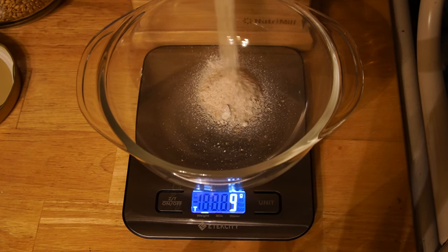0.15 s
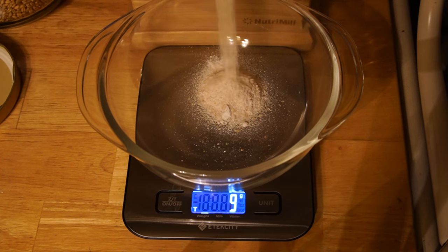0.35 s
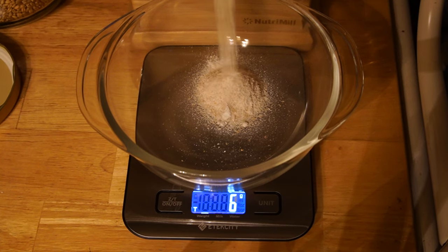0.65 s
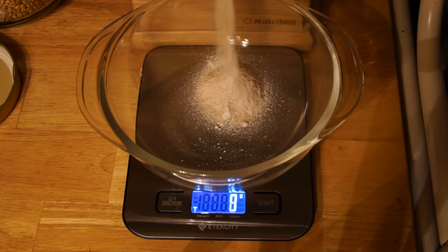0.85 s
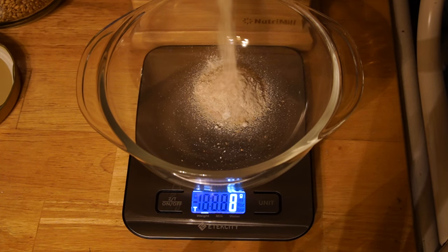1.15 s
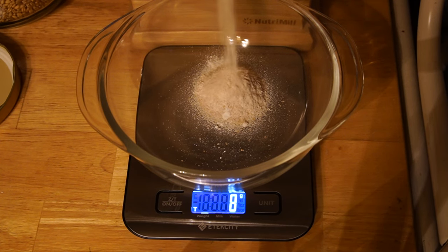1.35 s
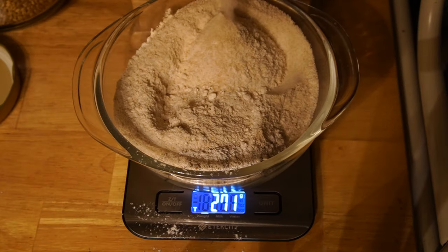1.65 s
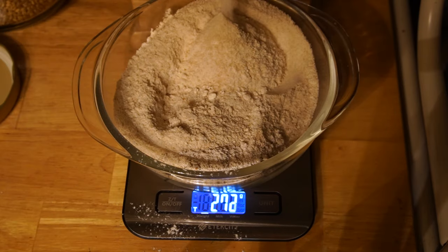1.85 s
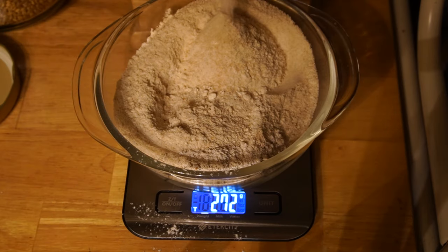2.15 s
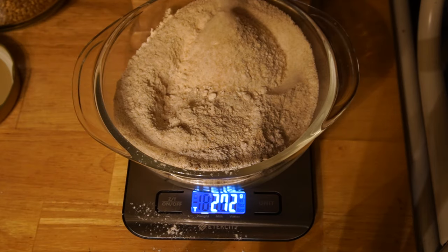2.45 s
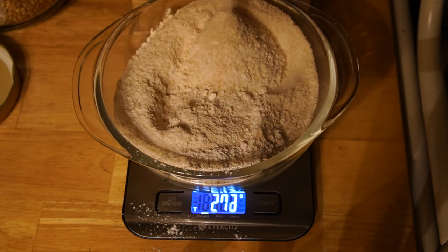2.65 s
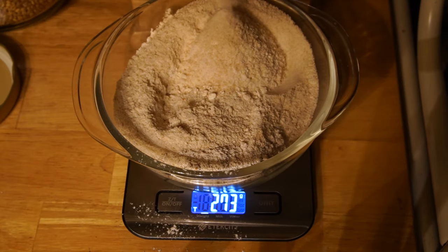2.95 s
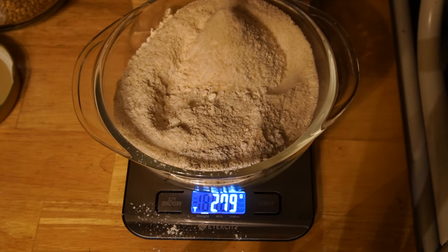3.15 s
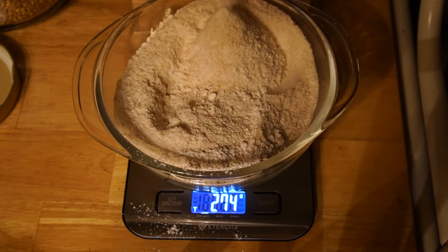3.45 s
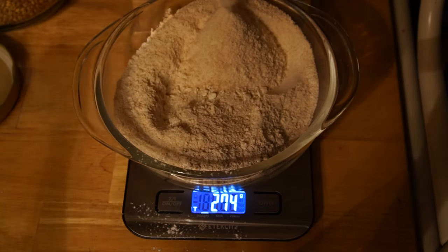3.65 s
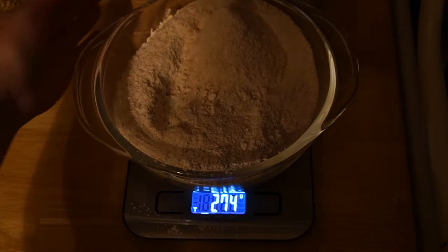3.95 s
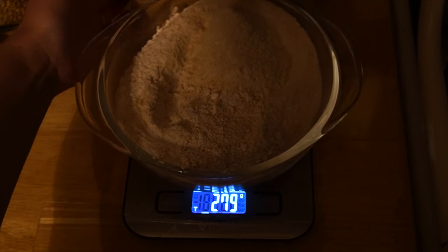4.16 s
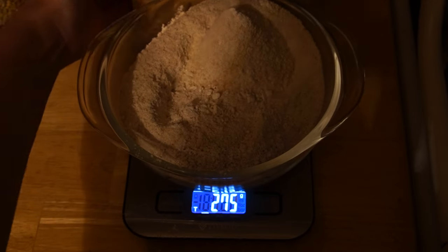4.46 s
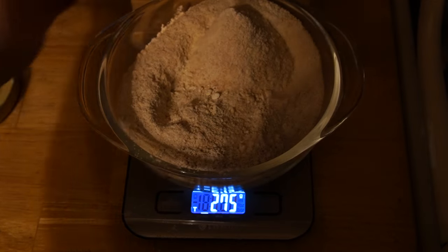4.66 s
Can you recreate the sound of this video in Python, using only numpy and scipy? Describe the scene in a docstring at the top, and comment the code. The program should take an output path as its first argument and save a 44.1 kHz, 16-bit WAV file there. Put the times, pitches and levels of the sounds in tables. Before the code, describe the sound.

A mill crushes grain in thick, uneven bursts, cracking sharply and spitting chips against its spout over a rush of flour. Suddenly the load is nearly gone: thin scraping, a held high whistle with a lower one beneath, and small ticks continue. Late on everything sinks, a rattly patch passes, and the stones halt. Close microphone, small dry kitchen, very faint reflections.

```python
"""On a kitchen counter, an electric grain mill runs at full feed; then the scene changes to the mill running
nearly empty. Kernels crushed between the stones knock the housing and splinter; chips rattle in the spout.
Flour hisses out as filtered noise, and the rubbing stones whistle in two narrow resonances. Late on, scrape,
rattle, hiss and whistles sink in level; the sine hum of the motor is switched off, and soon all grinding dies
away into a faint wash of reflections and the quiet room."""
import sys
import numpy as np
from scipy import signal
from scipy.fft import rfft, irfft
from scipy.io import wavfile
from scipy.ndimage import uniform_filter1d

SR = 44100
rng = np.random.default_rng(int(sys.argv[2]) if len(sys.argv) > 2 else 0)


def transcribe(u):
    """Save the signal u as a 16-bit wav file named by the first command-line argument.

    u: samples, shape (n,) or (channels, n), limited to [-1, 1]; the rate is SR.
    q: integer samples, one column per channel.
    """
    v = np.clip(np.atleast_2d(u).T, -1, 1)
    q = np.round(v * 32767).astype(np.int16)
    wavfile.write(sys.argv[1], SR, q)


def gain_from_decibels(decibels):
    """Convert decibel values to linear amplitude factors."""
    exponent = np.asarray(decibels, float) / 20
    return 10 ** exponent


N = 211724  # length in samples
T = np.arange(N) / SR  # time in s

CUT_S = 1.492  # full feed before, nearly empty after
SINK_S = 3.84  # scrape, rattle, hiss and whistles begin to sink, before the motor is switched off
OFF_S = 4.36  # the motor is switched off
FALL_S, FALL_DB_PER_S = 4.5, 113  # hiss, rattle and, half as fast, the upper whistle fall away
STOP_S, STOP_LOW_T60_S, STOP_HIGH_T60_S = 4.628, 0.09, 0.085  # the stones halt
CLUMP_ATTACK_S, CLUMP_FADE_DB_PER_S = 0.0086, 136.5
HUM_HZ, HUM_DB = 118.8, -74
FLOOR_DB = -84
ROOM_T60_S, ROOM_DB = 0.33, -27

# All levels below are relative settings inside the mix.
# kernels that crack aloud: [t/s, knock level/dB, splinter level/dB]
CRACKS = [(0.096, -21, -47), (0.287, -18.5, -54), (0.339, -29, -44), (0.368, -15.5, -39), (0.416, -28, -42),
          (0.457, -13, -37), (0.534, -27, -41), (0.67, -33, -47), (0.8, -28, -42.5), (0.893, -29, -49),
          (0.938, -15, -36.5), (1.059, -20, -40), (1.165, -28, -40.5), (1.293, -34, -39),
          (1.39, -19.5, -39.5), (1.577, -23, -59), (1.835, -38, -46), (1.94, -33, -51), (2.004, -31, -46),
          (2.109, -20, -43.5), (2.232, -32, -52), (2.318, -28, -58), (2.415, -32, -46), (2.448, -28, -52),
          (2.684, -31, -55.5), (3.166, -47, -61), (3.213, -21, -56), (3.443, -32, -53), (3.469, -24, -61),
          (3.622, -29, -54.5), (3.689, -22.5, -59), (3.798, -20.5, -45), (3.893, -21, -45),
          (3.989, -22.5, -49), (4.084, -31, -58), (4.144, -33, -60), (4.161, -30.5, -60),
          (4.192, -26.5, -57), (4.299, -24, -54.5), (4.347, -31, -64), (4.419, -22.5, -53.5),
          (4.447, -38, -54), (4.481, -23.5, -58)]
# hard chips that strike the spout: [t/s, level/dB]
CHIPS = [(0.0323, -41), (0.2349, -36), (0.2902, -37), (0.381, -33.5), (0.4299, -35), (0.4609, -31.5),
         (0.5337, -39), (0.6255, -44), (0.6993, -37), (0.7996, -41), (0.9238, -43), (0.9393, -33),
         (1.061, -35), (1.1199, -52), (1.3804, -37), (1.4471, -42), (1.598, -45), (1.835, -53),
         (1.858, -61), (2.004, -58), (2.1116, -47), (2.232, -55), (2.35, -51), (2.448, -55), (2.9243, -42),
         (2.9517, -50), (3.444, -49), (3.6207, -45), (3.697, -41), (3.7718, -41.5), (3.7968, -38),
         (3.809, -38.5), (3.8696, -50), (3.9085, -40.5), (4.2023, -43), (4.2752, -43.5), (4.3056, -43.5),
         (4.3496, -44.5), (4.382, -41), (4.4223, -42), (4.4488, -41), (4.572, -45), (4.5998, -48)]
# clumps of grain passing between the stones: [start t/s, length t/s, crushing level/dB]
CLUMPS = [(0, 0.022, -28), (0.11, 0.032, -30), (0.227, 0.26, -31.5), (0.533, 0.033, -31.5),
          (0.682, 0.025, -29.5), (0.803, 0.032, -34), (0.993, 0.14, -31), (1.167, 0.27, -35),
          (1.5, 0.054, -36), (1.575, 0.036, -33.5), (1.689, 0.09, -40.5), (1.827, 0.29, -38.5),
          (2.098, 0.11, -35), (2.333, .19, -38.5), (2.657, 0.034, -40), (2.76, 0.025, -40.5),
          (2.828, 0.11, -37.5), (3.008, 0.056, -35), (3.165, 0.066, -37.5), (3.28, 0.091, -43),
          (3.437, 0.036, -38), (3.625, 0.026, -44), (3.721, 0.029, -40), (3.794, .05, -37.5),
          (3.883, 0.15, -39.5), (4.076, .08, -51), (4.35, 0.27, -40)]
# spells in which the spout rattles harder: [middle t/s, half length t/s, added level/dB]
RATTLY_SPELLS = [(2.204, 0.11, 2.5), (2.908, 0.088, 1), (3.82, 0.1, 4.5), (4.395, 0.25, 6)]
# crushing between clumps: [full feed level/dB, nearly empty level/dB]
TRICKLE_DB = (-33, -49)
# crushing at which the load laws hold their stated levels: [full feed level/dB, nearly empty level/dB]
USUAL_DB = (-31, -39.5)

# how each sound follows the load:
# [full feed level/dB, nearly empty level/dB, dB per dB of crushing, late sinking in dB/s]
SCRAPE_LAW = (-42.5, -55.5, 0.83, 7)
RATTLE_LAW = (-56, -64, 0.43, 1.5)
HISS_LAW = (-49, -63.5, 0.22, 4)
WHISTLE_LAW = (-51.5, -50.5, .5, 9.5)
DRONE_LAW = (-56, -60.5, 1.0, 13)  # the lower whistle

# how a sharp knock reaches the housing: [f/Hz, level/dB]
KNOCK_COLOUR = [(100, -23.5), (350, -8.5), (800, -1.5), (3000, -2)]
# how the slow heave of the stones reaches it: [f/Hz, level/dB]
HEAVE_COLOUR = [(100, 0.5), (400, 3.5), (800, -17.5), (3000, -47)]
# broad colour of the housing: [f/Hz, level/dB]
HOUSING_COLOUR = [(35, -78.5), (60, -43), (108, -20), (188, -11), (228, -8.5), (392, -4.5), (519, -9),
                  (906, -4.5), (1800, -18.5), (2000, -21), (2600, -49), (4400, -120)]
# housing resonances: [f/Hz, width/Hz, level over the broad colour/dB]
HOUSING_MODES = [(229.3, 22, 8), (279, 74, 6), (423.6, 49, 6), (558.6, 21, 6), (710.4, 28, 6),
                 (777, 8.9, -1.5), (899, 50, 6.5), (1092, 180, 5.5), (1533, 230, 5)]
# broad colour of the stone faces: [f/Hz, level/dB]
STONE_COLOUR = [(1200, -30.5), (1800, -5), (2700, -6), (3100, -14), (4300, -16.5), (5000, -20.5),
                (7000, -44.5)]
# stone resonances: [f/Hz, width/Hz, level over the broad colour/dB]
STONE_MODES = [(2145, 120, 15), (2650, 180, 8), (3630, 200, 8), (4250, 200, 6)]
# broad colour of the spout: [f/Hz, level/dB]
SPOUT_COLOUR = [(2500, -26.5), (3400, -11.5), (4900, -0.5), (5600, -9), (7800, -10.5), (8500, -12),
                (10000, -8.5), (10300, -34.5)]
# spout resonances: [f/Hz, width/Hz, level over the broad colour/dB]
SPOUT_MODES = [(3700, 250, 12), (5080, 260, 19), (5400, 200, 17), (6180, 200, 15), (6480, 220, 16),
               (7400, 480, 19)]
# broad colour of the flour stream: [f/Hz, level/dB]
STREAM_COLOUR = [(1200, -32.5), (3300, -15.5), (4300, -16), (6000, -11), (8600, -22), (8800, -6.5),
                 (9900, -9.5), (10150, -22.5), (10350, -61)]
# resonances of the flour stream: [f/Hz, width/Hz, level over the broad colour/dB]
STREAM_MODES = [(8700, 750, 5), (9580, 520, 13)]
# upper rubbing resonance, a row for full feed and one for nearly empty: [f/Hz, wander rate/Hz]
HIGH_RUB = [(4607, 220), (4605, 85)]
# lower rubbing resonance, same rows: [f/Hz, wander rate/Hz]
LOW_RUB = [(2170, 130), (2145, 80)]
# colour of the quiet kitchen: [f/Hz, level/dB]
FLOOR_COLOUR = [(20, -2), (80, 0), (150, -8), (400, -22), (2000, -34), (10000, -46)]


def crushing(load_db, clumps, grit):
    """Kernels arrive in clumps and knock the housing, the stones heave over them; loud ones crack."""
    heave_db = load_db + 0.7 * clumps + 1.3 * walk(23) - 17.5
    heave = kernels(rate=1500, spread_db=2.0) * gain_from_decibels(heave_db)
    cracks = gain_from_decibels(7.5) * strikes(CRACKS, column=1, burst_s=0.003, click=1.6)
    knock_db = load_db + 1.2 * clumps + 1.28 * walk(60) - 2.5
    knocks = grit * gain_from_decibels(knock_db) + cracks
    push = ring(knocks, response(KNOCK_COLOUR)) + ring(heave, response(HEAVE_COLOUR))
    return gain_from_decibels(-7.5) * ring(push, response(HOUSING_COLOUR, HOUSING_MODES))


def scraping(level_db, clumps, grit):
    """The same knocks and finer grit between the stone faces, splintering with each crack."""
    fine_db = level_db + 0.77 * clumps + 3.6 * walk(80) - 2.0
    fine = unit(grit + 1.2 * rng.standard_normal(N)) * gain_from_decibels(fine_db)
    splinters = gain_from_decibels(26) * strikes(CRACKS, column=2, burst_s=0.0052, click=0.51)
    return scattered(fine + splinters, STONE_COLOUR, STONE_MODES, patchy_db=5.0, rate=34)


def rattle(level_db, clumps):
    """Bran and chips patter against the spout and set off its resonances."""
    patter_db = level_db + 0.5 * clumps + 1.2 * walk(64) + 2.0
    patter = kernels(rate=2500, spread_db=3.0) * gain_from_decibels(patter_db)
    chips = gain_from_decibels(16.5) * strikes(CHIPS, column=1, burst_s=0.0066, click=0.3)
    return scattered(patter + chips, SPOUT_COLOUR, SPOUT_MODES, patchy_db=4.5, rate=35)


def flour(level_db):
    """The stream of fine flour: unsteady noise hissing in two high resonances."""
    dust = rng.standard_normal(N) * gain_from_decibels(level_db + 0.5 * walk(48) + 2.0 * walk(150))
    return ring(dust, response(STREAM_COLOUR, STREAM_MODES))


def whistle(level_db, rub):
    """Rubbing keeps one narrow resonance going: size and phase wander like noise, faster under load."""
    tones = []
    for hz, rate in rub:
        core = walk(rate) + 1j * walk(rate)
        skirt = walk(3.5 * rate) + 1j * walk(3.5 * rate)  # a wider band around the core
        carrier = np.exp(2j * np.pi * hz * T)
        tones.append(unit(np.real((core + skirt) * carrier)))
    full, empty = tones
    emptied = np.clip((T - CUT_S) * 200, 0, 1)  # 5 ms crossfade
    return gain_from_decibels(level_db + 2.0) * (full * (1 - emptied) + empty * emptied)


def hum():
    """Motor core humming at twice the mains rate, faded over 30 ms up to the switch-off."""
    on = np.clip((OFF_S - T) / 0.03, 0, 1)
    level = gain_from_decibels(HUM_DB + 0.8 * walk(3))
    return on * level * np.sqrt(2) * np.sin(2 * np.pi * HUM_HZ * T)


def kitchen(x):
    """A faint, exponentially decaying wash of reflections, and the quiet room itself."""
    t = T[:SR // 2]
    colour = response([(100, -4), (1000, -6), (3000, 3), (5000, 3), (11000, -8)])
    wash = ring(rng.standard_normal(N), colour)[:len(t)]
    wash = wash * np.exp(-np.log(1000) * t / ROOM_T60_S)
    wash = wash / np.sqrt(np.sum(wash ** 2))
    still = gain_from_decibels(FLOOR_DB) * ring(rng.standard_normal(N), response(FLOOR_COLOUR))
    return x + gain_from_decibels(ROOM_DB) * ring(x, wash) + still


def load():
    """Crushing level in dB: a steady trickle plus clumps that arrive fast, hold, and thin out."""
    power = gain_from_decibels(2 * np.where(T < CUT_S, *TRICKLE_DB))
    for start, length, db in CLUMPS:
        same_side = (T < CUT_S) == (start < CUT_S)  # no clump carries across the cut
        rise = np.clip((T - start) / CLUMP_ATTACK_S + 1, 0, 1) * same_side
        clump_db = db - CLUMP_FADE_DB_PER_S * np.maximum(T - start - length, 0)
        power = power + rise ** 2 * gain_from_decibels(2 * clump_db)
    return 10 * np.log10(power)


def follow(load_db, full_db, empty_db, share, sink_db_per_s):
    """Level of a sound that rises with the load and sinks steadily late on."""
    over_db = load_db - np.where(T < CUT_S, *USUAL_DB)
    sunk_db = sink_db_per_s * np.maximum(T - SINK_S, 0)
    return np.where(T < CUT_S, full_db, empty_db) + share * over_db - sunk_db


def kernels(rate, spread_db):
    """Random knocks, rate per second on average, many small and some large; rms 1."""
    hit = rng.random(N) < rate / SR
    size = rng.exponential(size=N)
    push = rng.standard_normal(N)
    return unit(hit * gain_from_decibels(spread_db * np.minimum(size, 3)) * push)


def strikes(events, column, burst_s, click):
    """Each event is a click and a short decaying burst of splinters."""
    out = np.zeros(N + SR)
    tail = np.arange(SR // 10) / SR
    noises = rng.standard_normal((len(events), len(tail)))
    for row, noise in zip(events, noises):
        burst = noise * np.exp(-tail / burst_s)
        burst = burst / np.sqrt(np.sum(burst ** 2))
        burst[0] = click
        i = int(row[0] * SR)
        out[i:i + len(tail)] += gain_from_decibels(row[column]) * burst
    return out[:N]


def scattered(x, broad, modes, patchy_db, rate):
    """Hits land on ever different spots, so each resonance swells and fades on its own."""
    parts = (ring(x * gain_from_decibels(patchy_db * walk(rate)), response(broad, [mode])) for mode in modes)
    return sum(parts) / len(modes)


def response(broad, modes=(), size=8192):
    """Causal impulse response of a broad colour with resonances standing on it; energy 1."""
    hz = np.maximum(np.arange(size // 2 + 1) * SR / size, 1)
    f, db = np.transpose(broad)
    gain = gain_from_decibels(np.interp(np.log(hz), np.log(f), db, right=db[-1] - 26))
    for centre, width, over_db in modes:
        gain = gain * gain_from_decibels(over_db / (1 + (2 * (hz - centre) / width) ** 2))
    # folding the cepstrum onto positive time gives minimum phase
    cepstrum = irfft(np.log(gain))
    cepstrum[1:size // 2] *= 2
    cepstrum[size // 2 + 1:] = 0
    h = irfft(np.exp(rfft(cepstrum)))
    return h / np.sqrt(np.sum(h ** 2))


def ring(x, h):
    """Play x through an impulse response by convolution."""
    return signal.fftconvolve(x, h)[:N]


def walk(rate):
    """Random levels held 1 / rate s and smoothed twice over that time; spread near 1."""
    k = int(SR / rate)
    held = np.repeat(rng.standard_normal(N // k + 1), k)
    return 0.75 * uniform_filter1d(uniform_filter1d(held, k), k)[:N]


def unit(x):
    """Scale to rms 1."""
    return x / np.sqrt(np.mean(x ** 2))


def scene():
    """Mill in the kitchen; when the stones halt, the bright layers die slightly faster than the body."""
    load_db = load()
    scrape_db = follow(load_db, *SCRAPE_LAW)
    rattle_db = follow(load_db, *RATTLE_LAW)
    rattle_db = rattle_db + sum(db * np.exp(-((T - s) / half) ** 2) for s, half, db in RATTLY_SPELLS)
    hiss_db = follow(load_db, *HISS_LAW)
    whistle_db = follow(load_db, *WHISTLE_LAW)
    drone_db = follow(load_db, *DRONE_LAW)
    fall_db = FALL_DB_PER_S * np.maximum(T - FALL_S, 0)

    # shared by housing and stones, so that their knocks coincide
    clumps = walk(24.666)
    grit = kernels(rate=2200, spread_db=0.0)
    body = crushing(load_db, clumps, grit)
    body = body + whistle(whistle_db - 0.5 * fall_db, HIGH_RUB) + whistle(drone_db, LOW_RUB)
    bright = scraping(scrape_db, clumps, grit)
    bright = bright + rattle(rattle_db - fall_db, clumps) + flour(hiss_db - fall_db)

    halted_s = np.maximum(T - STOP_S, 0)
    body_fade = np.exp(-np.log(1000) * halted_s / STOP_LOW_T60_S)
    bright_fade = np.exp(-np.log(1000) * halted_s / STOP_HIGH_T60_S)
    return kitchen(body_fade * body + bright_fade * bright + hum())[None]


def band_limit(x):
    """A steep low-pass at the top of the band."""
    return signal.sosfilt(signal.butter(12, 11340, fs=SR, output="sos"), x)


def record(dry):
    """Deliver the finished mix."""
    return band_limit(dry)


dry = scene()
out = record(dry)
transcribe(out)
```